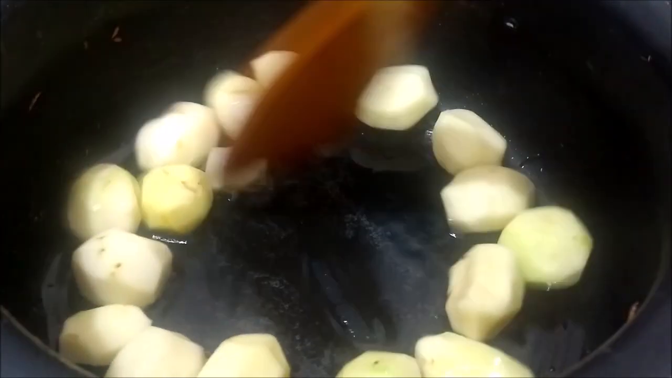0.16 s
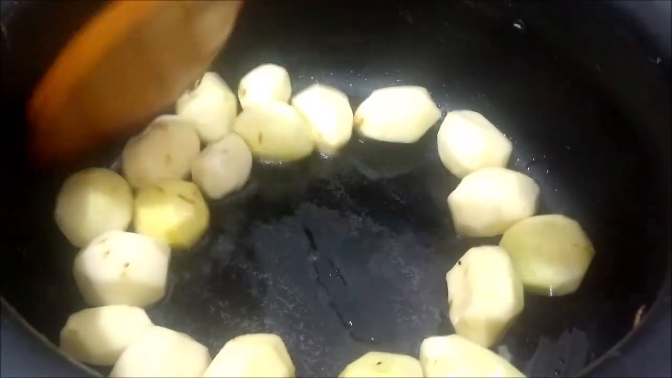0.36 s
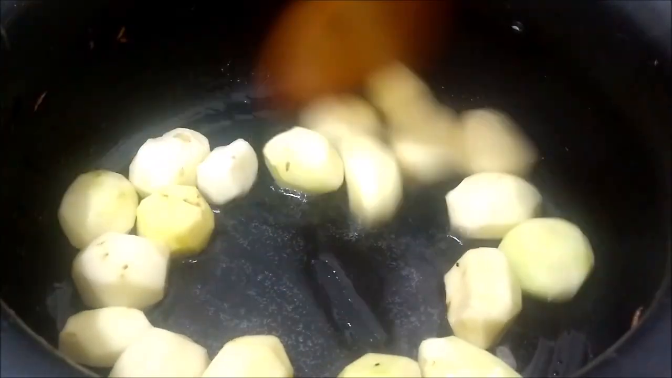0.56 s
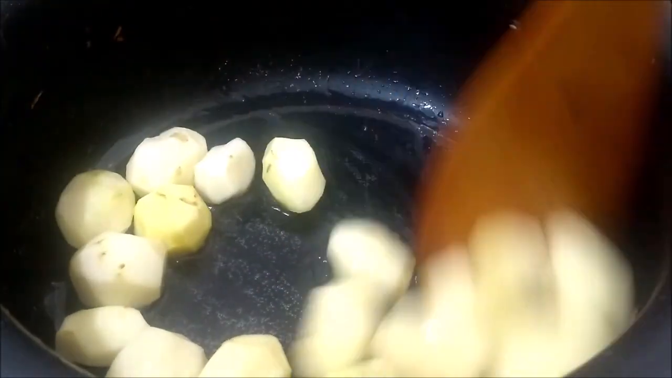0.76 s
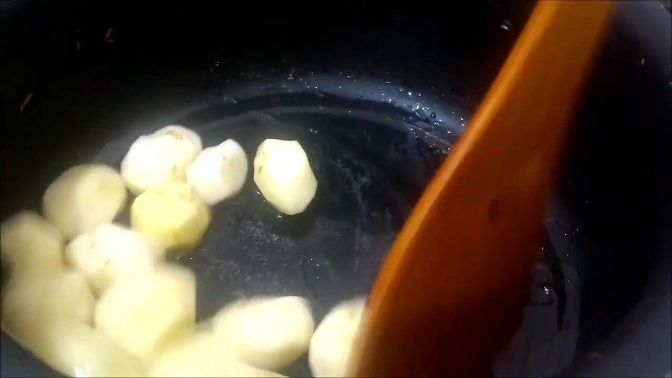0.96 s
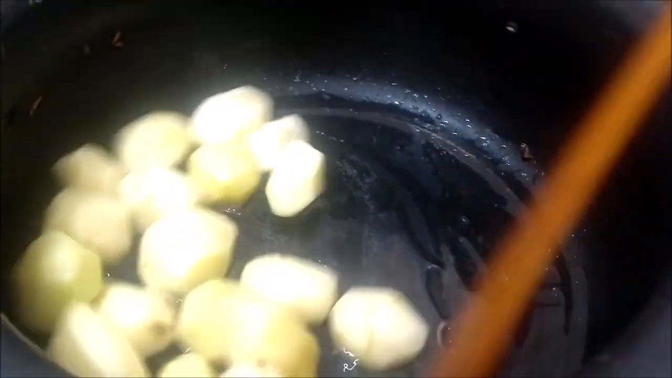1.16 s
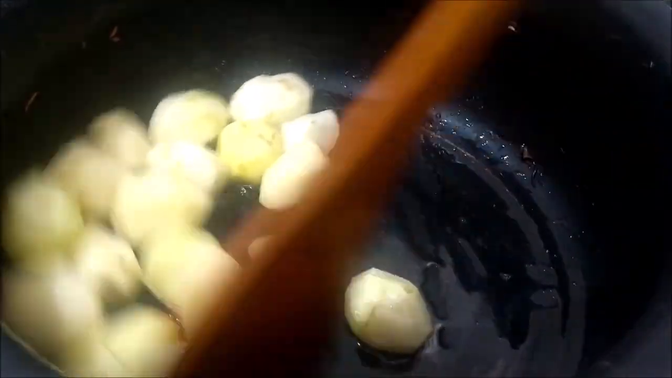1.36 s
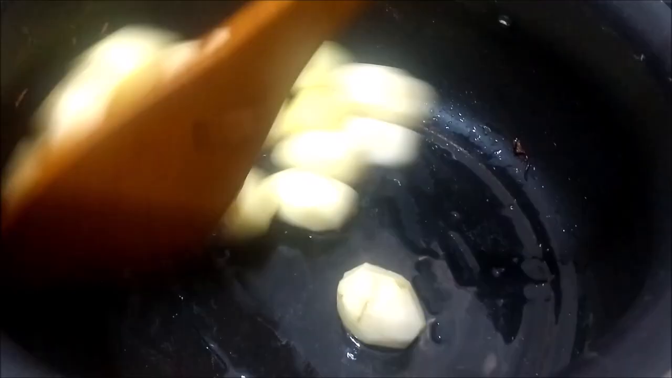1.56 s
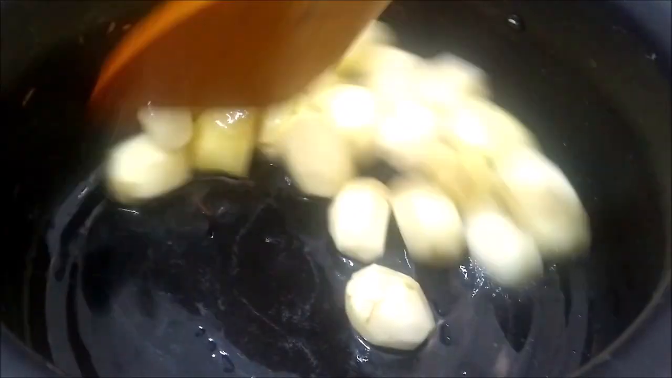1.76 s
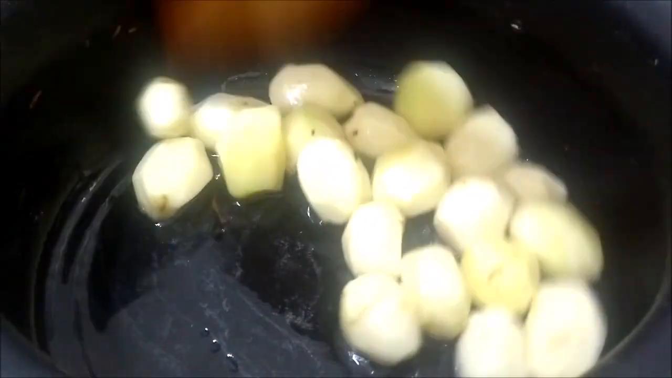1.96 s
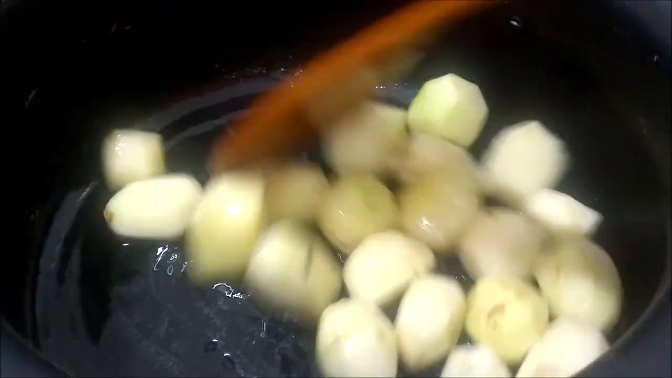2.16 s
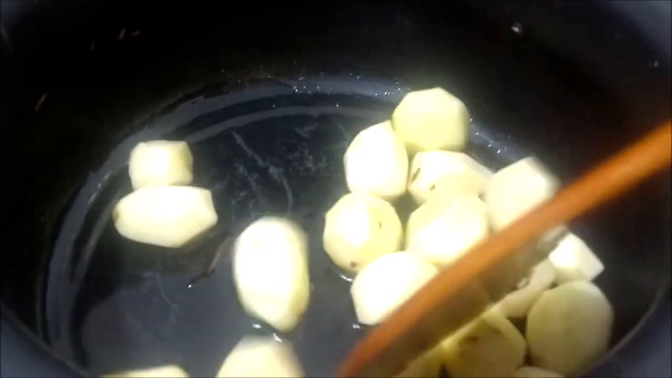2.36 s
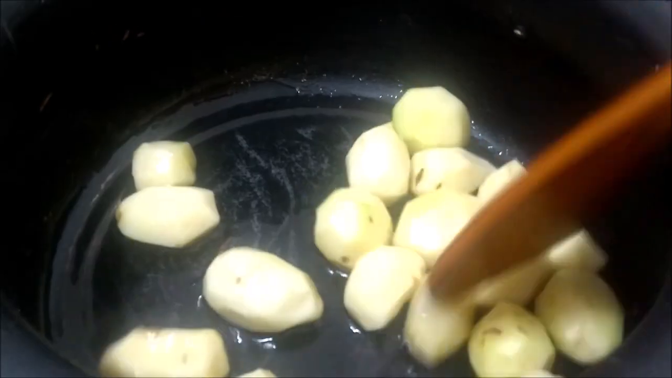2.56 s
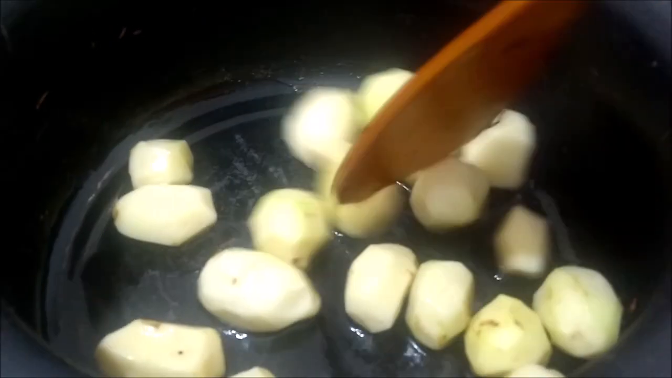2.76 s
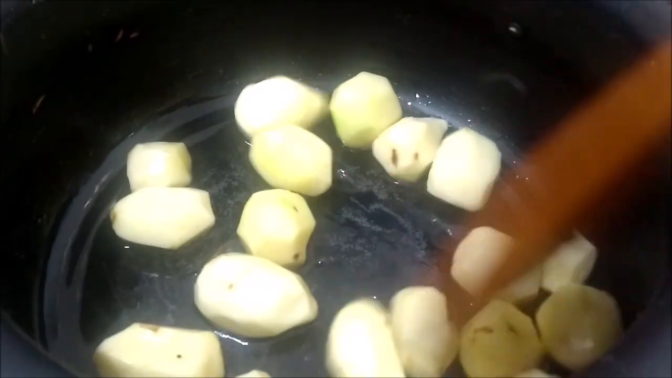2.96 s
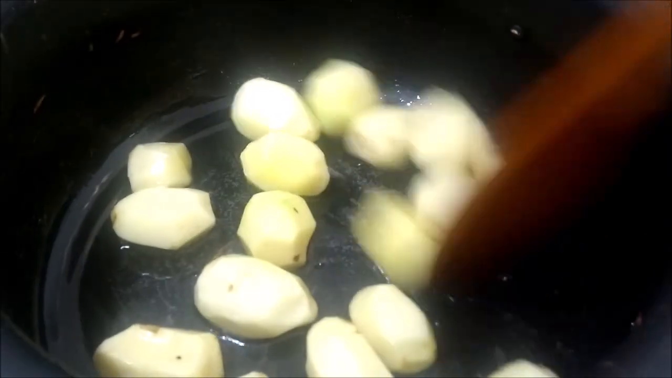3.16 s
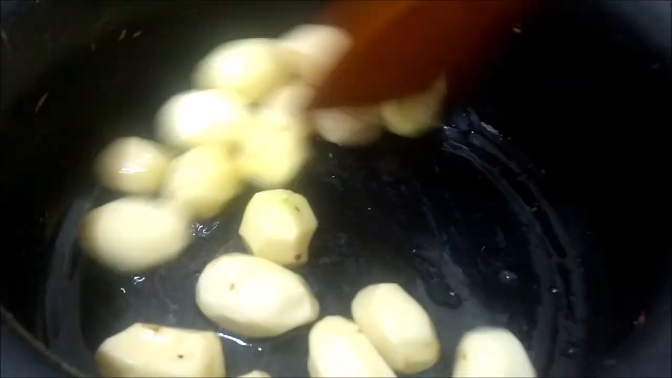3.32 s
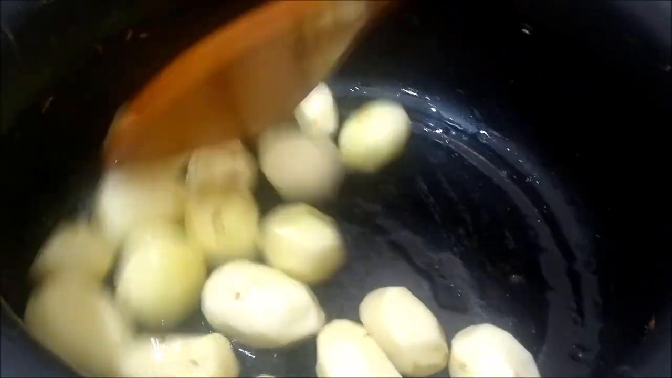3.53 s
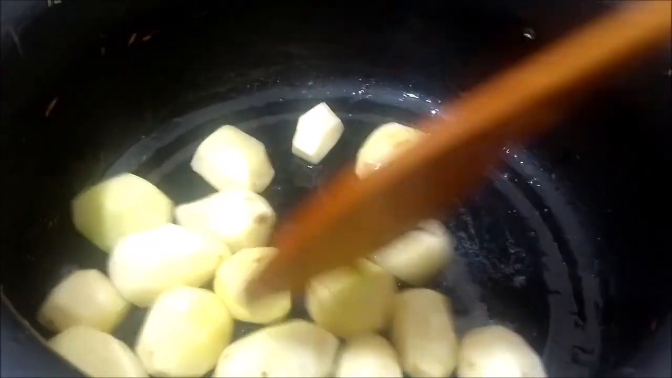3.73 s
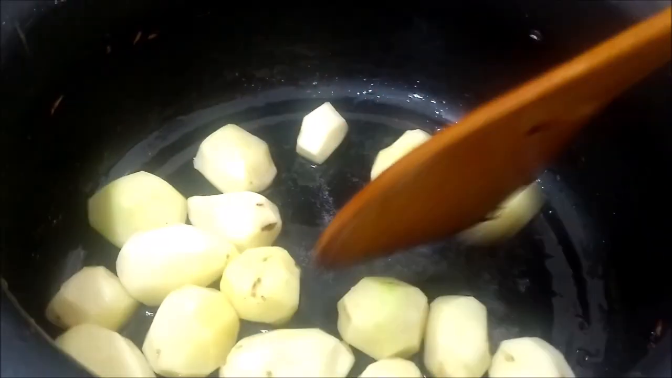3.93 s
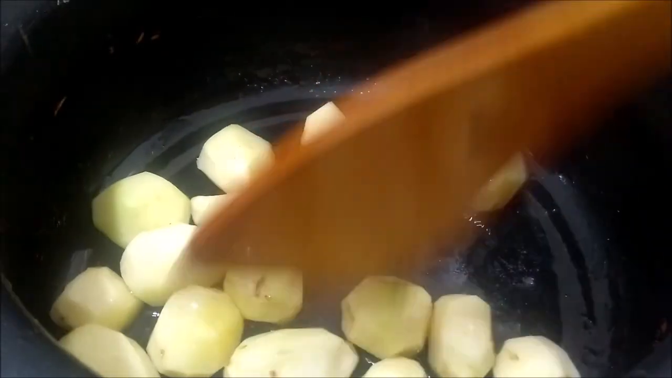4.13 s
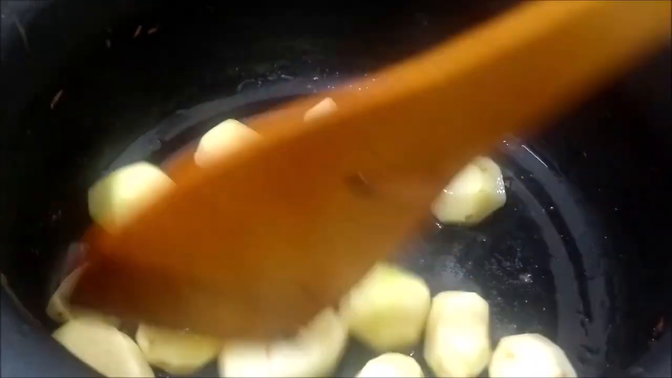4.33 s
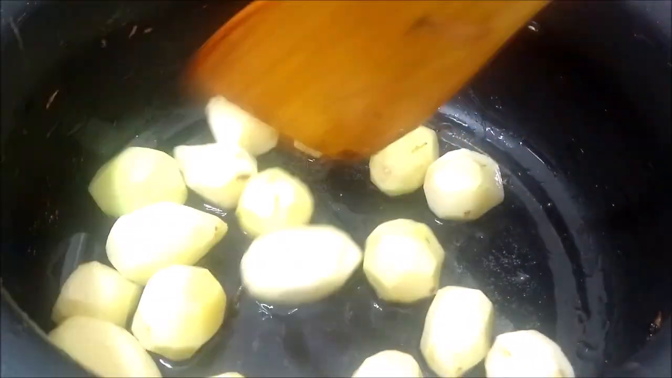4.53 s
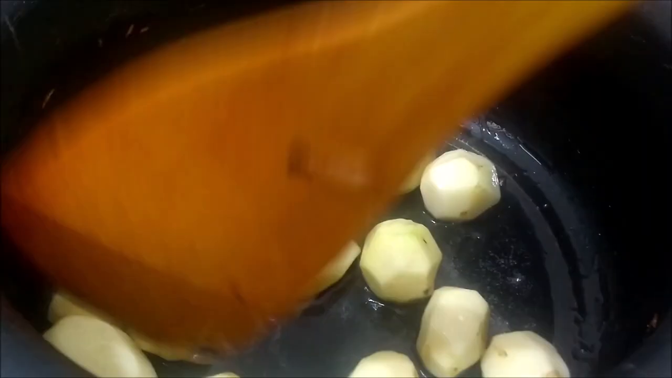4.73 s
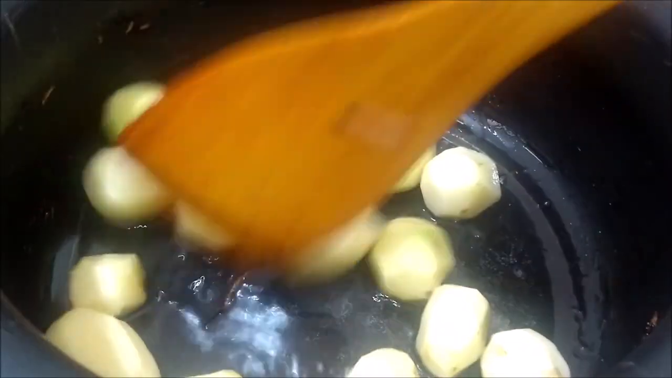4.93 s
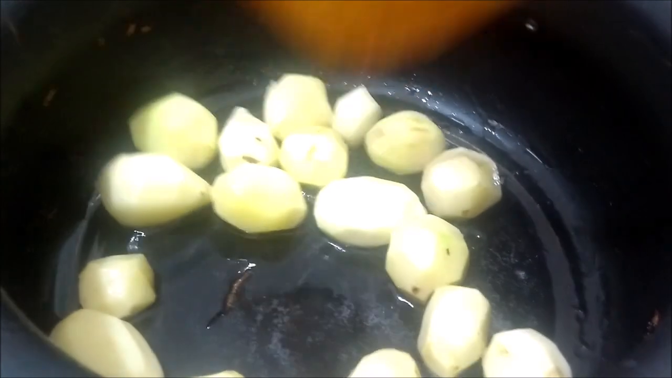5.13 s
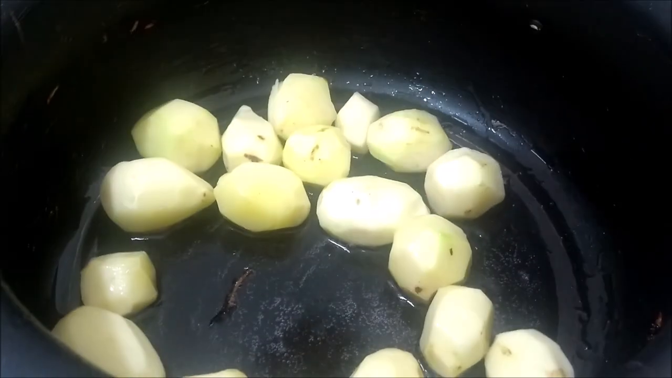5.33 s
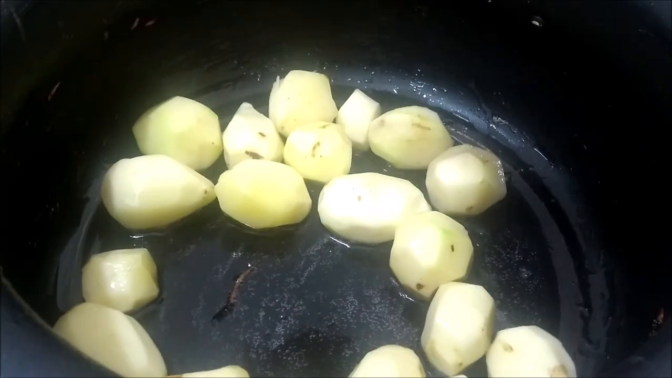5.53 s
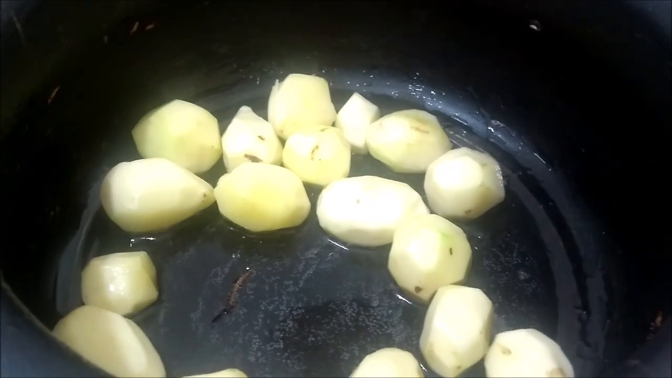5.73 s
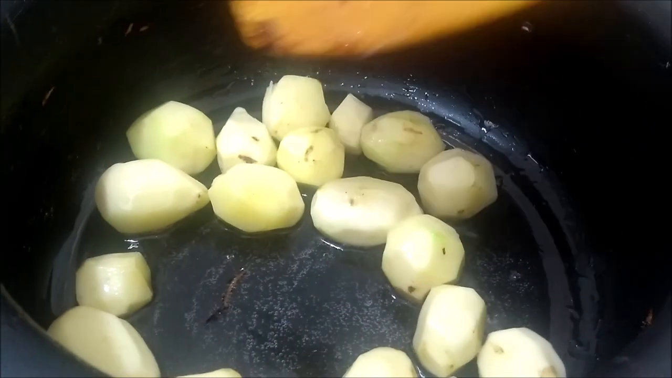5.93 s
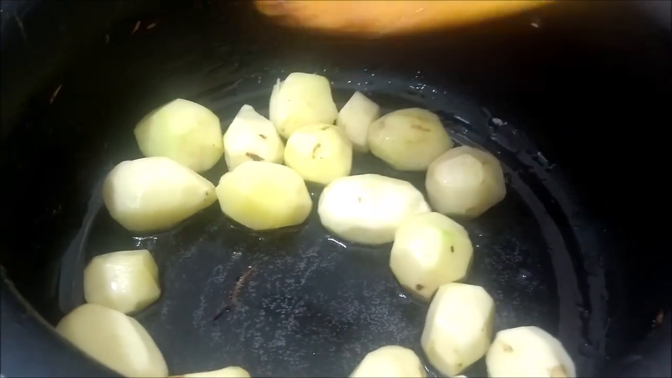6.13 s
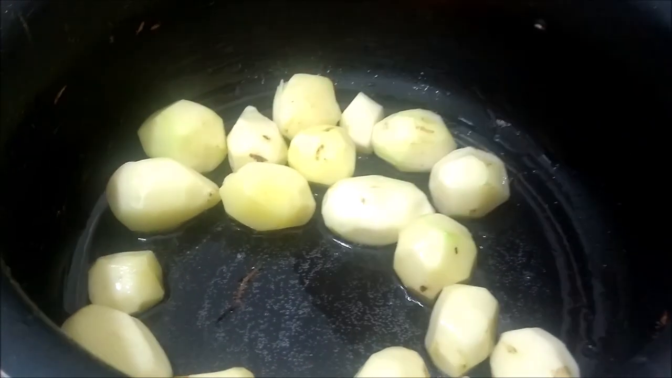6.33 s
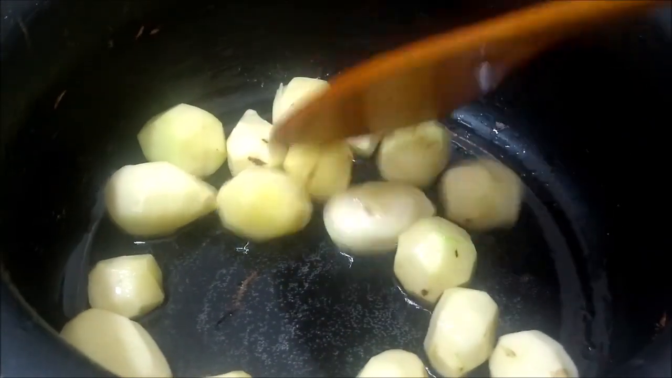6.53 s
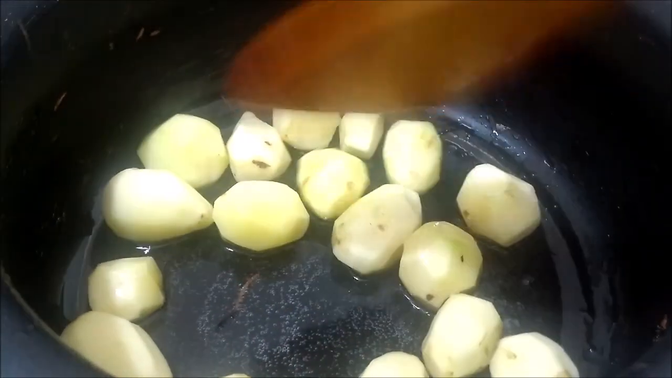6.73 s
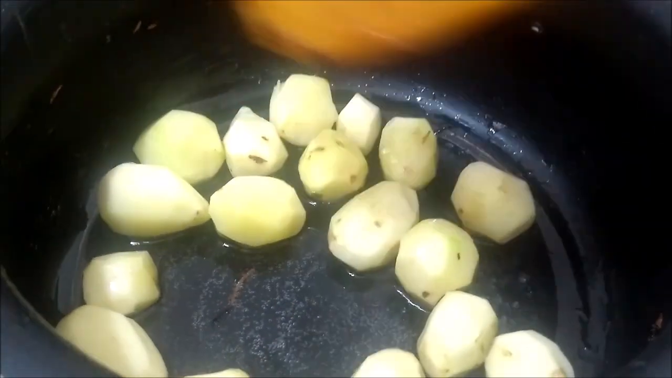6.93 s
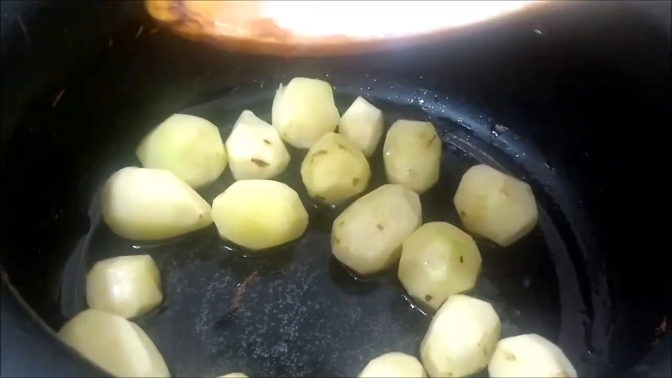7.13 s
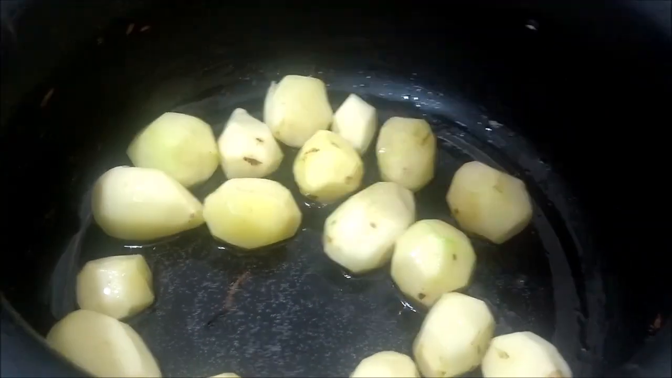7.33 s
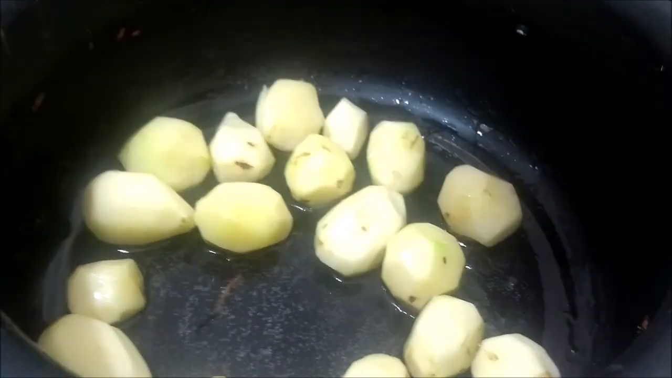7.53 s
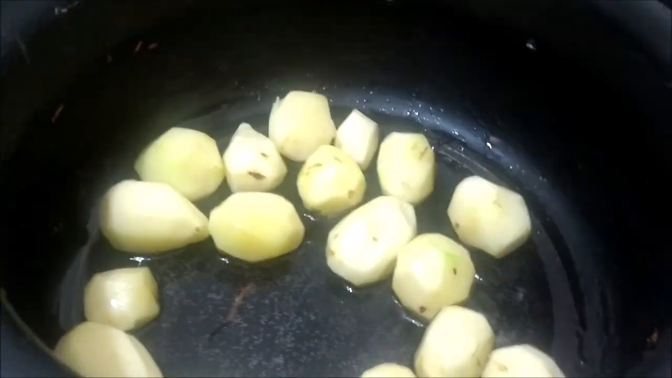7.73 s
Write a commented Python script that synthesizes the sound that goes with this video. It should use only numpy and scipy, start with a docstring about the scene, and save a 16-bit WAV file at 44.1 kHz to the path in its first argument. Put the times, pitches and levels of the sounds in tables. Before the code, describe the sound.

A wooden spatula knocks and pushes potatoes around a steel pan, with short dull metallic rings, bumpy rolling and low thuds from the pan on its stand. The oil starts subdued, then rises to a dense bright sizzle with a hollow hum inside the pan, crackling ticks and snappy pops. Stirring ceases, and the frying continues steadily, broken by one more tap. Heard very close, in stereo.

```python
"""Potatoes fry in oil in a deep pan close to a two-port microphone: steam bubbles burst as dense noise,
a high fizz over a lower spit, and noise through resonances makes the air inside the pan hum. Single
bubbles pop or thump and water droplets tick, each a short decaying tone. A wooden spatula knocks on the
steel, ringing decaying modes, and rolls the potatoes over it: bumpy noise through the modes of pan and stand."""
import sys
import numpy as np
from scipy import signal
from scipy.fft import rfft, irfft, next_fast_len
from scipy.io import wavfile
from scipy.ndimage import uniform_filter1d, map_coordinates

SR = 44100
rng = np.random.default_rng(int(sys.argv[2]) if len(sys.argv) > 2 else 0)


def int16_out(signal):
    """Quantize to a 16-bit WAV file."""
    q = np.round(np.clip(np.atleast_2d(signal).T, -1, 1) * 32767)
    wavfile.write(sys.argv[1], SR, q.astype(np.int16))


N = 347508


def amp(db):
    """dB to gain."""
    return 10 ** (np.asarray(db) / 20)


def unit(x):
    """x at rms 1."""
    return x / np.sqrt(np.mean(x ** 2) + 1e-20)


def along(points, hz):
    """Interpolate (Hz, value) points on a log frequency axis."""
    f, v = np.transpose(points)
    return np.interp(np.log(hz + 1), np.log(f + 1), v)


def curves(rows):
    """One value per sample for each column after the time."""
    s, *cols = np.transpose(rows)
    return [np.interp(np.arange(N) / SR, s, c) for c in cols]


def wobble(knots_per_s):
    """A smooth random curve through normal knots."""
    knots = rng.standard_normal(int(N * knots_per_s / SR) + 4)
    return map_coordinates(knots, [np.arange(N) * knots_per_s / SR])


def filtered(x, response):
    """x times a complex response of frequency."""
    m = next_fast_len(N + SR // 2)
    return irfft(rfft(x, m) * response(np.fft.rfftfreq(m, 1 / SR)), m)[..., :N]


def resonances(modes):
    """Causal response of (Hz, width Hz, dB) resonances, summed with alternating sign."""
    def mode(f, k, hz, width_hz, db):
        return (-1) ** k * amp(db) * 1j * f * width_hz / (hz * hz - f * f + 1j * f * width_hz)
    return lambda f: sum(mode(f, k, *row) for k, row in enumerate(modes))


def butter_filtered(x, order, hz, kind):
    """x through a Butterworth filter."""
    return signal.sosfilt(signal.butter(order, hz, kind, fs=SR, output="sos"), x)


# base levels of the frying:
# (time [s], high fizz [dB], spit, mostly 2-7 kHz [dB], hum of the air in the pan [dB])
FRYING_LEVELS = [(0.03, -47, -47, -39.5), (0.33, -48.5, -46, -51), (0.48, -44.5, -44.5, -43),
                 (0.6, -38.5, -40, -44), (0.88, -38, -39, -39), (1.12, -38.5, -39, -38.5),
                 (1.47, -36, -36.5, -37.5), (1.62, -30, -29.5, -37), (1.95, -30, -29, -32),
                 (2.33, -31, -32.5, -35.5), (2.4, -35.5, -34, -33.5), (2.8, -32, -33, -37),
                 (3.1, -35.5, -33.5, -36), (3.4, -28, -31, -38.5), (3.65, -29.5, -31, -37),
                 (3.84, -34, -34, -38.5), (4.0, -31.5, -33.5, -34.5), (4.4, -35.5, -35, -36),
                 (4.6, -33, -34, -35), (5.3, -37, -33, -36.5), (6.2, -36.5, -32.5, -36.5),
                 (6.7, -37.5, -33, -36.5), (7.1, -35.5, -36, -35.5), (7.88, -33.5, -33, -35.5)]
# spectrum of the larger bubbles: (frequency [Hz], level [dB])
SPIT_SPECTRUM = [(1100, -13), (1620, -8.5), (1900, -6), (2200, -3.5), (2450, -13), (2700, -10), (3000, -3),
                 (3650, -1), (4000, -1.5), (4600, -3), (5300, -1), (5650, -2), (6300, -3), (8000, -8.5),
                 (11000, -5.5)]
# spectrum of the small bubbles: (frequency [Hz], level [dB])
FIZZ_SPECTRUM = [(4000, -89), (7000, -4), (9500, -4.5), (11000, -0.5), (12000, 0), (13000, -1),
                 (14000, -9.5), (15000, -4.5)]
SPIT_FOLLOWS = 0.73  # share of each swell's or dip's dB that the spit takes


def frying():
    """Small bubbles fizz high, larger ones spit lower, and noise drives the air in the pan."""
    fizz_db, spit_db, hum_db = curves(FRYING_LEVELS)
    surge = wobble(12) + 1.18 * wobble(45)
    swell_db = swells()
    fizz = bursts(spread_db=-2.0, patchy_db=1.5)
    fizz = unit(filtered(fizz, lambda f: amp(along(FIZZ_SPECTRUM, f))))
    spit = bursts(spread_db=5.5, patchy_db=1.5)
    spit = unit(filtered(spit, lambda f: amp(along(SPIT_SPECTRUM, f))))
    hum = humming(amp(1.5 * wobble(60)) * rng.standard_normal((3, N)))
    fizz = amp(fizz_db + swell_db + 0.084 * surge + 1.33 * wobble(25)) * fizz
    spit = amp(spit_db + SPIT_FOLLOWS * swell_db + 0.83 * surge) * spit
    return fizz + spit + amp(hum_db + 1.3 * wobble(14)) * hum


def bursts(spread_db, patchy_db):
    """Three streams of tiny bursts, one every sample, of unequal sizes, in patches of time and pitch."""
    size = amp(spread_db * uniform_filter1d(rng.exponential(size=N), size=8))
    z = signal.stft(size * rng.standard_normal((3, N)), nperseg=256)[2]
    patches = uniform_filter1d(rng.standard_normal(z.shape[1:]), size=9, axis=0)  # along pitch
    patches = uniform_filter1d(patches, size=5, axis=1)  # along time
    return signal.istft(z * amp(patchy_db * unit(patches)), nperseg=256)[1][:, :N]


# brief swells and dips of the fizz: (time [s], change from the steady fizz [dB])
FIZZ_SWELLS = [(.915, 0), (1.25, 5), (1.49, -2), (1.88, 0.5), (2.85, 3.5), (3.25, 5.5), (3.42, 1),
               (3.71, -0.5), (3.95, 3), (5.42, 0.5), (6.592, 6.5), (6.89, -0.5), (6.98, 4.5), (7.07, 4.5),
               (7.39, 0), (7.569, 1.5)]
SWELL_ONSET_S, SWELL_RETURN_S = 0.028, 0.034


def swells():
    """dB that the swells and dips add: a smooth change up to each time and a return after it."""
    t = np.arange(N) / SR
    return sum(db * np.exp(-((t - s) / np.where(t < s, SWELL_ONSET_S, SWELL_RETURN_S)) ** 2)
               for s, db in FIZZ_SWELLS)


# modes of the air in the pan: (frequency [Hz], width [Hz], level [dB])
AIR_MODES = [(1065, 115, 0), (1620, 50, -6), (560, 200, -13), (2680, 110, -3)]
# spatula and potato heap retune the air: (time [s], first mode [Hz])
AIR_TUNING = [(0.1, 1049), (0.6, 1090), (0.66, 1027), (0.97, 1098), (1.57, 1037), (1.96, 1081),
              (2.22, 1017), (2.44, 1095), (2.81, 1017), (3.05, 1099), (3.28, 1052), (3.41, 1107),
              (3.59, 1035), (5.08, 1054), (5.23, 1081), (6.75, 1057), (7.51, 1105), (7.88, 1095)]


def humming(drive):
    """The first air mode slides with its tuning; the others stay."""
    # the open top favours the first mode
    mouth = resonances([(1101, 185, 0.5), (397, 1600, -7.5), (1930, 1190, -1.5)])
    first_mode, other_modes = resonances(AIR_MODES[:1]), resonances(AIR_MODES[1:])
    first = filtered(drive, lambda f: first_mode(f) * mouth(f))
    shift_rad = 2 * np.pi * np.cumsum(curves(AIR_TUNING)[0] - AIR_MODES[0][0]) / SR
    first = np.real(signal.hilbert(first, next_fast_len(N))[:, :N] * np.exp(1j * shift_rad))
    return unit(first + filtered(drive, lambda f: other_modes(f) * mouth(f)))


# big bubbles that thump the air: (time [s], level [dB])
BUBBLE_THUMPS = [(0.795, -18.5), (0.817, -20), (.833, -18), (0.869, -14.5), (1.022, -19.5), (1.036, -26),
                 (1.281, -20), (1.314, -19), (1.557, -19.5), (1.58, -20), (1.826, -25), (2.084, -24),
                 (2.11, -20), (2.139, -22), (2.228, -22), (2.272, -23), (2.29, -17.5), (2.308, -17.5),
                 (2.381, -24), (2.452, -20), (2.719, -18), (3.713, -20), (3.997, -24), (4.079, -22),
                 (4.376, -23), (4.668, -19), (4.684, -13.5), (4.975, -16), (4.985, -17), (5.654, -25),
                 (5.938, -19.5), (6.273, -10), (6.429, -22), (6.631, -23), (6.641, -19.5), (6.668, -22.5),
                 (7.213, -18), (7.8, -24)]
# oil pops: (time [s], level [dB], pitch [Hz])
OIL_POPS = [(0.308, -25, 3600), (0.9082, -7, 13100), (1.0806, -23, 5500), (1.1425, -25, 5700),
            (1.251, -14, 11300), (1.6224, -26, 3870), (1.8825, -10, 10900), (2.0165, -11, 7800),
            (2.4939, -28, 5670), (2.585, -24, 3830), (2.6092, -9, 13620), (2.835, -7.5, 11400),
            (3.05, -20, 5710), (3.115, -18.5, 5700), (3.17, -24, 3760), (3.252, -26, 10600),
            (3.2894, -18.5, 3820), (3.597, -21, 3484), (3.6944, -27, 11650), (3.7103, -8, 11220),
            (3.834, -24, 5520), (3.9199, -9.5, 11750), (3.9455, -19, 12740), (4.3795, -22, 5560),
            (4.4078, -18, 5190), (4.46, -21, 5530), (4.534, -19.5, 3900), (4.6441, -16, 8800),
            (4.7427, -24, 3416), (5.064, -20, 5840), (5.1715, -15.5, 5350), (5.227, -27, 5700),
            (5.2497, -18, 10860), (5.392, -12, 13700), (5.6604, -25, 3810), (5.7461, -25, 3720),
            (5.7622, -20.5, 4000), (5.868, -11, 7920), (5.902, -24, 3700), (5.947, -21.5, 5050),
            (5.9929, -24, 5610), (6.208, -21, 5640), (6.249, -18, 4300), (6.266, -20, 3400),
            (6.286, -19.5, 2730), (6.3953, -13, 13380), (6.459, -15, 8500), (6.525, -19, 3223),
            (6.529, -10.5, 9000), (6.531, -14, 12500), (6.559, -21, 3720), (6.6167, -18, 6165),
            (6.8534, -15, 6400), (6.8787, -16, 11440), (6.9657, -28, 3930), (6.9779, -16, 11000),
            (7.0648, -23, 11120), (7.2201, -29, 3720), (7.3072, -36, 3360), (7.369, -26, 3460),
            (7.7099, -17, 7940)]
BUBBLE_T60_S = 0.038
POP_CYCLES = 36  # cycles to fall 60 dB


def pops():
    """Single bubbles: deep ones thump the air, small ones crack in a few cycles."""
    out, t = np.zeros(N + SR), np.arange(SR // 8) / SR
    for s, db in BUBBLE_THUMPS:
        out[round(s * SR):][:len(t)] += thump(s, db, BUBBLE_T60_S, t)
    for s, db, hz in OIL_POPS:
        hiss = unit(butter_filtered(rng.standard_normal(len(t)), 1, [0.9 * hz, 1.55 * hz], "bandpass"))
        crack = np.sin(2 * np.pi * hz * t) + 0.7 * hiss
        envelope = amp(db - 60 * t * hz / POP_CYCLES) * (1 - np.exp(-t / 0.00015))
        out[round(s * SR):][:len(t)] += envelope * crack
    return out[:N]


def thump(s, db, t60_s, t):
    """The lowest strong air mode of the pan, struck once near its tuning of the moment."""
    hz = np.interp(s, *np.transpose(AIR_TUNING)) * rng.normal(1, 0.0037)
    return amp(db - 60 * t / t60_s) * (1 - np.exp(-t / 0.0012)) * np.sin(2 * np.pi * hz * t)


TICKS_UNDER_SPIT_DB = -13


def crackles(count=900):
    """Stray droplets of water burst as brief pitched ticks that follow the spit level."""
    when, pitch = rng.random(count), rng.standard_normal(count)
    size = np.minimum(rng.exponential(size=count), 4)[:, None]
    t = np.arange(SR // 100) / SR
    hz = np.clip(5000 * np.exp(.35 * pitch), 2600, 13000)[:, None]
    envelope = amp(4.8 * size - 60 * t * hz / 35) * (1 - np.exp(-t / 0.0019))  # 60 dB in 35 cycles
    ticks = envelope * np.sin(2 * np.pi * hz * t)
    where = (when[:, None] * N).astype(int) + np.arange(len(t))
    level_db = curves(FRYING_LEVELS)[1] + TICKS_UNDER_SPIT_DB
    return amp(level_db) * np.bincount(where.ravel(), ticks.ravel(), N)[:N]


# knocks: (time [s], steel level [dB], air thump [dB], clack [dB],
# thud [dB, each stand mode 3.5 dB under this plus its own level],
# pitch most struck [Hz], t60 of the damping by potatoes before limiting [s], air t60 [s])
PAN_KNOCKS = [(0.016, -4, 7.5, -6, -49, 587, 0.078, 0.013), (.085, -19.5, -31, -36, -59, 577, 0.24, 0.063),
              (.31, -25, -38, -29.5, -55, 470, 0.46, 0.065),
              (0.515, -26, -22.5, -27.5, -58, 394, 0.21, 0.075),
              (0.761, -20, -28, -40, -44, 567, 0.14, 0.083), (.89, -20.5, -15, -40, -57, 500, 0.13, 0.047),
              (1.086, -7.5, 1.5, -15.5, -48, 490, 0.22, 0.012),
              (1.106, -12.5, -43, -34, -54, 380, 0.21, .03), (1.165, -21, -34, -32, -55, 380, 0.19, .035),
              (1.267, -26, -36, -32, -54, 390, 0.6, .035), (1.294, -18.5, -27, -50, -50, 504, 0.53, 0.085),
              (1.511, -20, -12.5, -42, -57, 550, 0.14, 0.031), (1.721, -25.5, -31, -34, -49, 550, 1, .035),
              (1.926, -17, -25, -19.5, -34, 450, 0.37, 0.48), (2.015, -43, -34, -27, -29, 444, 0.28, .035),
              (2.096, -27, -40, -45, -45, 510, 0.31, .035), (2.359, -22, -13.5, -32, -31, 443, 0.18, 0.046),
              (2.63, -31.5, -40, -50, -48, 450, 0.35, 0.036),
              (2.852, -22.5, -43, -47, -38, 478, 0.44, 0.048),
              (3.03, -17.5, -30, -39, -29, 370, 0.18, 0.037), (3.087, -24, -29, -32, -35, 382, 0.37, 0.053),
              (3.173, -27, -38, -50, -55, 420, 0.36, .035), (3.219, -35, -37, -45, -37, 417, .2, .035),
              (3.278, -23.5, -37, -39, -31, 417, 0.085, 0.032),
              (3.498, -20, -23, -29, -29, 407, 0.19, 0.028),
              (3.534, -8.5, -13.5, -23.5, -34, 398, 0.032, 0.019),
              (3.555, -20, -39, -40, -47, 337, 0.26, .035), (3.6, -26, -40, -47, -42, 500, 0.57, .035),
              (3.77, -33, -44, -45, -48, 540, 0.14, .035), (3.875, -13.5, -23, -30, -37, 523, 0.19, 0.035),
              (4.337, -26.5, -25, -36, -39, 494, 0.45, .035), (4.742, -11, -17.5, -14, -33, 415, 1, 0.23),
              (6.524, -13.5, -28, -20.5, -25.5, 487, 0.2, 0.082)]
# steel modes: (frequency [Hz], level [dB], t60 before scaling [s])
STEEL_MODES = [(332, -1.5, 0.16), (373, -2, 0.4), (412, 5, 0.58), (453.4, 3.5, 0.56), (509.2, 6, 0.15),
               (557.3, 7, 0.098), (586, 3, 0.051), (667.4, 3, 0.36), (930, 6, .15), (1555, 0, .05),
               (1760, -3, .06)]
# pan on its stand: (frequency [Hz], width [Hz], level [dB])
STAND_MODES = [(106, 7.6, 5.5), (153.8, 12, 7), (179, 8.6, -3), (250.5, 6.5, 5.5), (294.5, 6.2, 0.5),
               (62, 33, -8), (214, 58, 0)]
# potatoes land on the ringing steel and stop it: (time [s])
MUTE_TIMES = [1.142, 2.016, 4.892]
MUTE_DB_PER_S = 350
NEARNESS_DB, FARTHEST_DB = 118, 21  # mode loss per unit of log distance from struck pitch; its limit
MODE_LUCK_DB = 3  # most that chance adds to a mode in one blow
BLADE_DB = -4  # the spatula's note, against the air thump
PUSH_DB, PUSH_T60_S = -4.5, 0.013  # dull push of contact at the struck pitch, against the steel
CRACK_DB, CRACK_T60_S = -12.5, 0.0058  # bright crack of contact, against the clack
TAIL_DB, TAIL_T60_S = -16.5, 0.17  # longer, softer noisy tail of the clack, against the clack


def knocks():
    """A blow rings the steel modes nearest its pitch, thumps the air and the stand, and clacks the wood."""
    out, t = np.zeros(N + SR), np.arange(SR // 3) / SR

    def tone(hz):
        return np.sin(2 * np.pi * hz * t)

    def wood_noise():
        return unit(butter_filtered(rng.standard_normal(len(t)), 3, [620, 1250], "bandpass"))

    for s, db, air_db, clack_db, thud_db, hz, damping_t60_s, air_t60_s in PAN_KNOCKS:
        steel = steel_ring(hz, damping_t60_s, t)
        muted_db = -MUTE_DB_PER_S * sum(np.maximum(s + t - m, 0) for m in MUTE_TIMES if m > s)
        # potatoes jostle the ring
        rattle = amp(1.4 * map_coordinates(rng.standard_normal(40), [t * 70])) * (1 - np.exp(-t / 0.0022))
        steel = amp(db + muted_db) * rattle * steel / np.abs(steel).max()

        clack = wood_noise() + 0.64 * tone(1500) + 1.24 * tone(3150) * amp(-60 * t / 0.0017)
        clack = amp(clack_db - 60 * t / 0.025) * clack
        crack = np.diff(rng.standard_normal(len(t) + 3), n=1)[2:]
        crack = amp(clack_db + CRACK_DB - 60 * t / CRACK_T60_S) * crack
        tail = amp(clack_db + TAIL_DB - 60 * t / TAIL_T60_S) * wood_noise()
        push = amp(db + PUSH_DB - 60 * t / PUSH_T60_S) * tone(hz)
        push = butter_filtered(push, 2, 220, "highpass")
        blade = amp(air_db + BLADE_DB - 60 * t / 0.0015) * tone(850)

        thud = sum(amp(level) * np.exp(-np.pi * width_hz * t) * tone(f) for f, width_hz, level in STAND_MODES)
        thud = amp(thud_db - 3.5 - 60 * t / 0.14) * (1 - np.exp(-t / 0.0072)) * thud
        blow = steel + clack + crack + tail + push + blade + thud
        out[round(s * SR):][:len(t)] += blow + thump(s, air_db, air_t60_s, t)
    return out[:N]


def steel_ring(struck_hz, damping_t60_s, t):
    """Decaying steel modes, weaker away from the struck pitch; potatoes on the steel shorten them all."""
    damping = 1 / np.clip(damping_t60_s, .04, 1)
    ring = np.zeros(len(t))
    for f, level, t60_s in STEEL_MODES:
        luck, phase = rng.random(2)
        loss_db = min(NEARNESS_DB * abs(np.log(f / struck_hz)), FARTHEST_DB)
        fall_db = 60 * t * (0.16 / t60_s + damping)
        ring += amp(level - loss_db + MODE_LUCK_DB * luck - fall_db) * np.sin(2 * np.pi * (f * t + 0.24 * phase))
    return ring


# potatoes and spatula rubbing the steel:
# (time [s], low steel modes [dB], high steel modes [dB], rumble of the stand [dB])
STIRRING_LEVELS = [(0.15, -54, -42, -60), (0.4, -47.5, -51, -57), (0.88, -40.5, -38, -52),
                   (1.12, -37, -47, -49.5), (1.45, -41.5, -41, -47), (1.72, -59, -46, -45.5),
                   (1.95, -33, -40, -43.5), (2.33, -44.5, -53, -47.5), (2.8, -52, -47, -54),
                   (3.02, -48, -50, -50), (3.1, -37, -47, -54), (3.2, -45, -42, -50),
                   (3.33, -39.5, -43, -46), (3.47, -45, -44.5, -41.5), (3.6, -33.5, -37.5, -46),
                   (3.78, -47, -50, -55), (3.93, -44.5, -37, -45), (4.2, -47.5, -45, -54),
                   (4.6, -58.5, -43.5, -54.5), (4.92, -39.5, -43, -45), (5.4, -53.5, -51, -58.5),
                   (5.75, -51, -46.5, -56), (6.515, -52, -48.5, -52), (6.54, -30, -35, -43),
                   (6.66, -46, -46.5, -46.5), (6.9, -52, -45, -52), (7.88, -54.5, -45, -56.5)]


def stirring():
    """Bumpy rolling keeps the steel modes murmuring and shakes the pan on its stand."""
    modes = [(hz, np.log(1000) / np.pi / t60_s * 1.6, db) for hz, db, t60_s in STEEL_MODES]
    bumps = rng.random(N) < 120 / SR  # about 120 a second
    rub = amp(2.7 * wobble(30)) * (1 + 14 * bumps) * rng.standard_normal((3, N))
    parts = zip(curves(STIRRING_LEVELS), [modes[:4], modes[4:8], STAND_MODES])
    return sum(amp(level_db) * unit(filtered(rub, resonances(body))) for level_db, body in parts)


def echoed(x, t60_s):
    """A single sound as three streams: itself, and two smears by the pan's walls."""
    t = np.arange(SR // 20) / SR
    walls = rng.standard_normal((2, len(t))) * amp(-60 * t / t60_s)
    walls = walls / np.linalg.norm(walls, axis=1, keepdims=True)
    return np.vstack([x, signal.fftconvolve(x[None], walls, axes=1)[:, :N]])


# sound common to both ports: (frequency [Hz], share [0-1])
COMMON_SHARE = [(60, .6), (110, .55), (170, .4), (260, .3), (350, .65), (430, .8), (950, .97), (1250, .99),
                (1800, .45), (1980, .6), (2100, 1), (2450, 1), (2600, .7), (2880, .3), (3130, 1), (3500, 1),
                (4000, .5), (4600, .65), (5300, .43), (5800, .7), (7700, .2), (8600, .5), (9800, .15),
                (10900, .7), (11600, .15), (13100, .5), (14400, .2)]
# phase turn of the left port: (frequency [Hz], lead [rad])
LEFT_LEAD = [(0, -3.1), (200, -3.1), (330, -5.4), (500, -5.8), (850, -6.3), (1300, -6.3), (1550, -7.4),
             (1950, -8.6), (2080, -9.42), (2500, -9.42), (2600, -10), (2830, -10.8), (3100, -12.57),
             (3700, -12.57), (4650, -15.7), (5900, -18.8), (7250, -22), (8400, -25.1), (9000, -25.4),
             (9400, -28), (10700, -31.4), (12000, -34.5), (13000, -37.3), (14300, -40.1)]
# balance of the ports: (frequency [Hz], left minus right [dB])
PORT_TILT = [(40, 0), (100, -1), (180, -3), (340, -6.5), (430, -4), (520, 0.5), (620, 1.5), (920, 0),
             (1600, -2), (1950, -3), (2100, 0), (2500, 0), (2680, -2), (2900, 0), (3550, 0), (4300, -3),
             (4900, -4), (8240, -5.5), (14200, -7.5)]


def ports(streams, share_limit):
    """Each port hears the first stream, phase-turned in the left, plus a stream of its own."""
    f, lead_rad = np.transpose(LEFT_LEAD)
    side = np.array([[.5], [-.5]])

    def alike(hz):
        return np.clip(along(COMMON_SHARE, hz), 0, np.where(hz > 1800, share_limit, 1))

    def turn(hz):
        return np.exp(1j * np.interp(hz, f, lead_rad) * [[1], [0]])

    def tilt(hz):
        return amp(side * along(PORT_TILT, hz))

    shared = filtered(streams[0], lambda hz: np.sqrt(alike(hz)) * turn(hz) * tilt(hz))
    return shared + filtered(streams[1:], lambda hz: np.sqrt(1 - alike(hz)) * tilt(hz))


KNOCK_WALL_T60_S, POP_WALL_T60_S = .03, .02
SPOT_SHARE = .85  # a sound from one spot reaches the ports less alike than the fizz all round


def scene():
    """Everything in the pan, as the two ports hear it; the walls hold pops more briefly than knocks."""
    around = frying() + stirring()
    spots = echoed(pops() + crackles(), POP_WALL_T60_S) + echoed(knocks(), KNOCK_WALL_T60_S)
    return ports(around, share_limit=1) + ports(spots, SPOT_SHARE)


TOP_HZ = 14290


def record(dry):
    """The microphone thins the deep bass; peaks clip at full scale; then a band limit cuts the top."""
    heard = butter_filtered(dry, 2, 28, "highpass")
    return filtered(np.clip(heard, -1, 1), lambda hz: hz < TOP_HZ)


dry = scene()
out = record(dry)
int16_out(out)
```